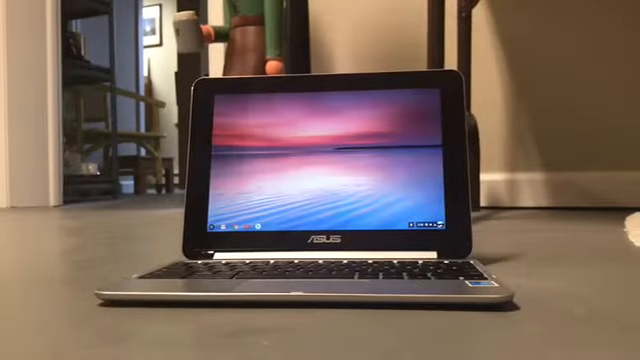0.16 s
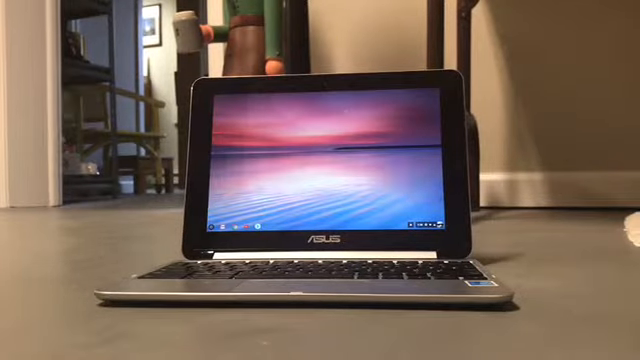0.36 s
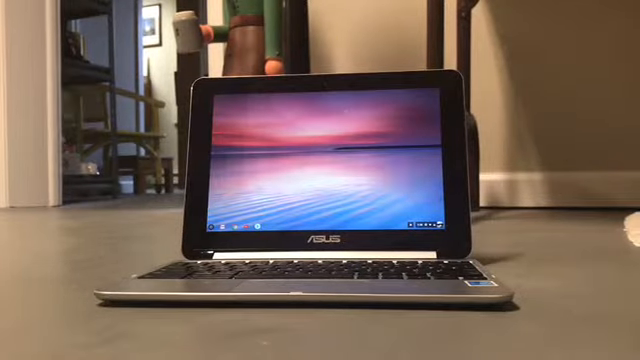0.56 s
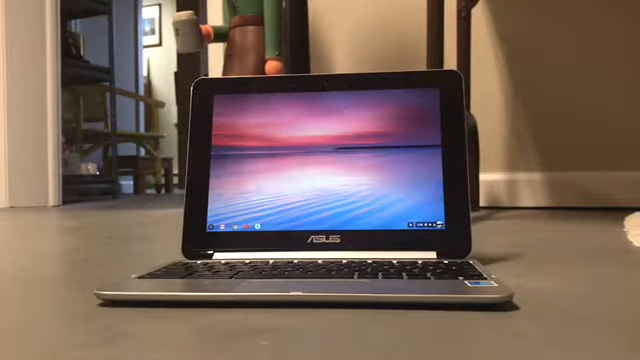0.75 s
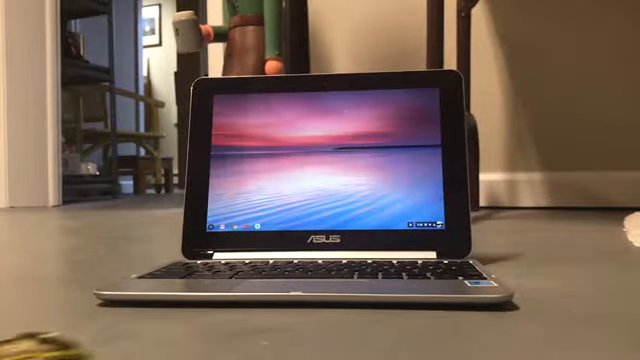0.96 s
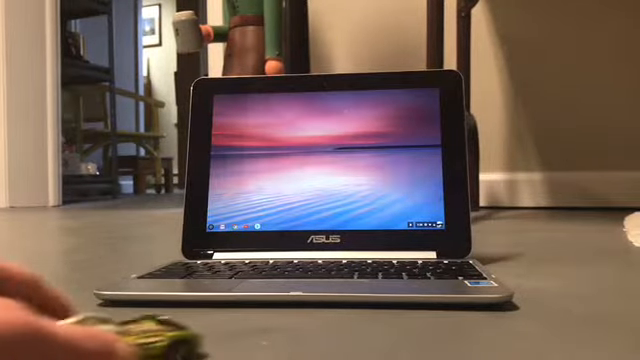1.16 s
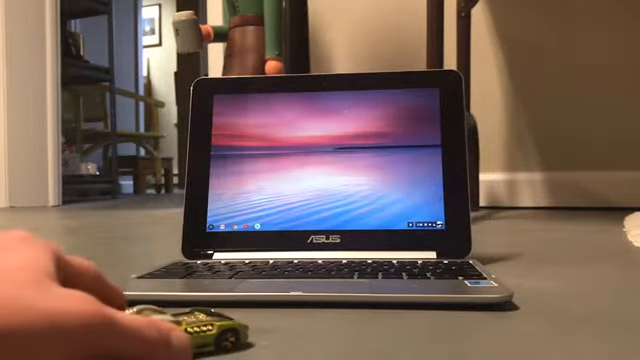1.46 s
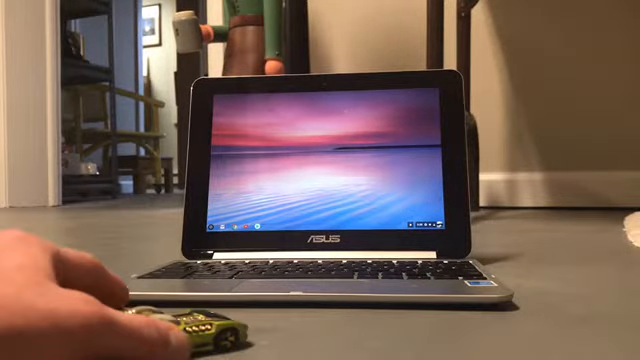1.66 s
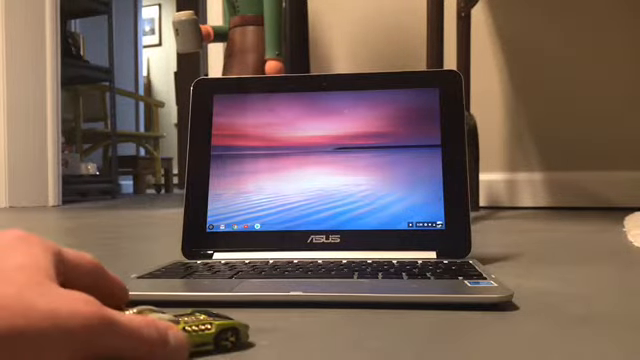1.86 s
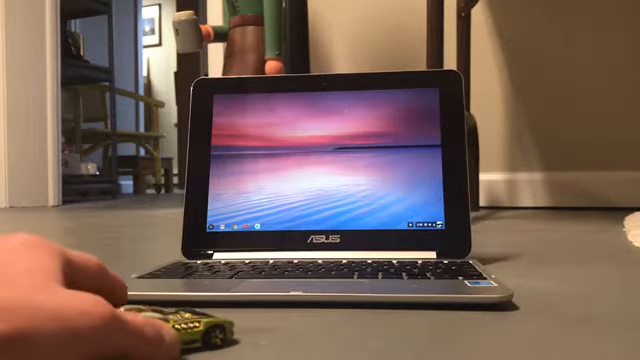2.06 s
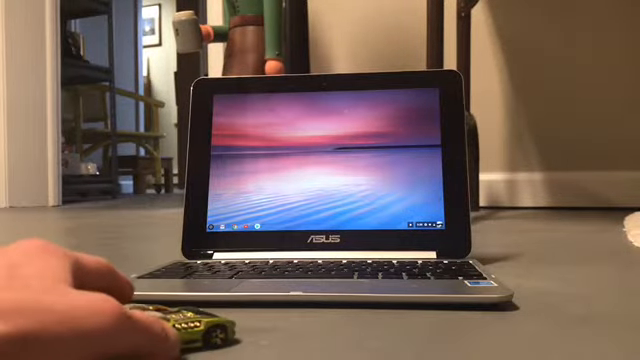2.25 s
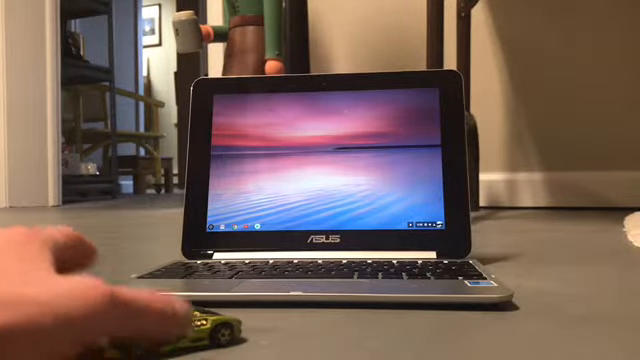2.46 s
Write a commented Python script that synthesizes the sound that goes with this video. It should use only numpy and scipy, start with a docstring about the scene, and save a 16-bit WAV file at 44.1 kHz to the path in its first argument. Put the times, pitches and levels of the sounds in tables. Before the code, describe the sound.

A die-cast toy car is pushed toward the microphone over a hard indoor floor, its wheels rattling and ticking. After it stops come a few small clicks and a faint hiss of skin, over a steady ventilation rumble.

```python
"""A die-cast toy car clicks down on a hard floor and is pushed towards the listener. Grit under its
bumpy wheels makes the metal body ring. It stops, clicks and crackles under the fingers and is nudged
once, then the hand slides away with a hiss of skin on the floor. The car echoes briefly in the room,
and a ventilation rumble runs underneath."""
import sys
import numpy as np
from scipy import signal
from scipy.fft import rfft, irfft
from scipy.io import wavfile
from scipy.ndimage import map_coordinates

SR = 44100
rng = np.random.default_rng(int(sys.argv[2]) if len(sys.argv) > 2 else 0)


def wrap_up_sound(samples):
    """Save the sound to the file named by the first command line argument, as 16-bit audio."""
    columns = np.atleast_2d(samples).T
    # keep every value between -1 and 1, then stretch to whole-number steps
    tamed = np.clip(columns, -1, 1)
    steps = np.round(tamed * 32767).astype(np.int16)
    wavfile.write(sys.argv[1], SR, steps)


N = 114660
TIME = np.arange(N) / SR

# the low, middle and high bands of the car's sound: (lower edge [Hz], upper edge [Hz])
BANDS = [(1300, 4500), (4500, 7500), (7500, 15900)]
BAND_FILTERS = [signal.butter(3, band, "band", fs=SR, output="sos") for band in BANDS]
HIT_S = .005   # a click or knock has the energy of a steady sound this long at its level


def rolling():
    """The long push: the wheels ring the body, the floor murmurs, the tyres hiss as the car slows."""
    # loudness of the wheels in each band: (time [s], low [dB], middle [dB], high [dB])
    wheel_levels = [(0.199,-66,-85.5,-77),(0.31,-58.5,-60,-63),(0.35,-52.5,-48,-57.5),(0.412,-60,-49,-57),(0.43,-48.5,-40.5,-46.5),(0.47,-49.5,-43.5,-48),(0.55,-43,-40.5,-44),(0.62,-47.5,-37.5,-39),(0.69,-43.5,-39.5,-46),(0.77,-42.5,-41.5,-47),(0.805,-39,-43.5,-49),(0.835,-41,-43,-47),(0.87,-44.5,-37,-45),(0.97,-45.5,-43.5,-51.5),(1.04,-44.5,-39,-46),(1.09,-42.5,-37,-44.5),(1.16,-45,-39,-43),(1.224,-45.5,-40,-44),(1.24,-52,-59,-65),(1.34,-70.5,-77,-82)]
    # the upper two bands creep up in pitch as the car rolls on: (time [s], pitch [ratio])
    ring_pitch = [(.35, 0.93), (.6, 0.96), (.85, 1.025), (1.2, 1.065)]
    # dull noise from the floor itself: (time [s], level [dB])
    floor_levels = [(.25, -66), (.44, -51.5), (.75, -57), (1.2, -57), (1.25, -74)]
    # hiss of the tyres: (time [s], level [dB])
    tyre_levels = [(1.02, -70), (1.12, -42), (1.22, -45), (1.245, -66)]
    low, *upper = wheel_noise()
    position = np.cumsum(np.interp(TIME, *np.transpose(ring_pitch)))   # reading faster raises the pitch
    upper = [map_coordinates(band, [position], order=5, mode="mirror") for band in upper]
    wheels = sum(gain * band for gain, band in zip(gain_curves(wheel_levels), [low, *upper]))
    floor = gain_curves(floor_levels)[0] * hiss(hz=1250, width_hz=1300)
    tyres = gain_curves(tyre_levels)[0] * hiss(hz=7170, width_hz=1700)
    return wheels + floor + tyres


def wheel_noise(bump_hz=84, bump_db=3, flutter_db=1.05, grains_per_s=9000, spread_db=3.5):
    """Grit taps the uneven wheels, harder on each bump, and rings the body; one signal per band."""
    bumps = np.cumsum(bump_hz * (1 + .147 * drift(hz=7.4))) / SR
    pressure = from_db(bump_db * np.cos(2 * np.pi * bumps) + flutter_db * drift(hz=70))
    sizes = from_db(spread_db * np.minimum(rng.exponential(1, N), 4))
    signs = rng.choice([-1, 1], N)
    hits = rng.random(N) < grains_per_s / SR
    ring = car_body(pressure * sizes * signs * hits)
    return [rms_one(signal.sosfilt(band, ring)) for band in BAND_FILTERS]


def car_body(force, direct_db=-7):
    """Each tap is heard directly and through the ringing of the metal car."""
    # the tones at which body and chassis ring: (pitch [Hz], width [Hz], gain [dB])
    body_tones = [(1700, 220, -11), (2670, 140, 0.5), (2934, 280, -0.5), (3314, 270, 1), (4740, 700, -14.5),
                  (5494, 450, 2), (5796, 280, 5), (6800, 730, -14), (8350, 700, -5), (9245, 460, 1.5),
                  (10780, 500, -6), (12100, 700, -5), (13500, 950, -7)]
    force = signal.sosfilt(signal.butter(2, 14000, fs=SR, output="sos"), force)
    ring = sum(from_db(db) * resonance(force, hz, width) for hz, width, db in body_tones)
    return from_db(direct_db) * force + ring


def clicks(size=1500, gain_db=.5):
    """Wheels and axles hit floor and body: each click is a quickly dying burst of tiny taps."""
    # clicks, with band levels before gain_db: (time [s], low [dB], middle [dB], high [dB], decay [s])
    hits = [(0.076,-59,-59,-67.5,0.0018),(0.2426,-33,-25.5,-26.5,0.0028),(0.266,-43,-37,-46,0.0038),(0.357,-50,-47,-54,0.0022),(0.388,-49.5,-42.5,-56,0.002),(0.4257,-42.5,-39.5,-42,0.003),(0.4457,-48,-38.5,-37,0.0011),(0.623,-41,-31,-31,0.001),(0.6314,-41,-33.5,-39,0.0024),(0.6703,-56,-39,-37,0.0022),(0.6958,-39,-36,-37.5,0.0022),(0.7198,-38,-36,-27,0.00082),(0.7308,-22,-23.5,-24,0.0016),(0.8017,-36.5,-37,-50,0.0044),(0.8487,-53,-35,-40.5,0.002),(1.0023,-46,-36,-43.5,0.0018),(1.0738,-36.5,-33,-34,0.002),(1.1205,-51,-33,-47.5,0.0016),(1.509,-68,-71,-72.5,0.00083),(1.5252,-56,-53.5,-52,0.001),(1.7056,-52.5,-62,-55.5,0.00032),(1.8008,-55,-50,-65,0.0014),(1.8139,-46,-47,-58,0.0046),(1.83,-56,-54,-49,0.0012),(1.8385,-51,-40,-44,0.0017),(1.8488,-31.5,-32,-34,0.0014),(2.0213,-82,-78,-64,0.0003),(2.266,-57.5,-53,-81,0.0038),(2.2791,-49,-43,-48,0.003)]
    out = np.zeros(N + size)
    for start, *levels_db, decay_s in hits:
        taps = rng.choice([-1, 1], size) * np.exp(-TIME[:size] / decay_s)
        ring = car_body(taps)
        bands = [rms_one(signal.sosfilt(band, ring)) for band in BAND_FILTERS]
        i = int(start * SR)
        out[i:i + size] += sum(from_db(db) * band for db, band in zip(levels_db, bands))
    return from_db(gain_db) * np.sqrt(HIT_S * SR / size) * out[:N]


def rattles(swell_db=7.5, release_s=.0018, gain_db=2.5):
    """The wheels turn briefly, getting louder until they catch."""
    # short turns, with band levels before gain_db: (start [s], end [s], low [dB], middle [dB], high [dB])
    turns = [(0.7254, 0.734, -44, -26, -31), (1.775, 1.787, -64, -63.5, -78),
             (1.825, 1.844, -46.5, -40.5, -55), (1.845, 1.864, -58, -52, -63)]
    bands, out = wheel_noise(), np.zeros(N)
    for start, end, *levels_db in turns:
        span = slice(int(start * SR), int((end + 2 * release_s) * SR))
        swell = from_db(np.interp(TIME[span], [start, end], [-swell_db, 0]))
        release = np.exp(-np.maximum(TIME[span] - end, 0) / release_s)
        for db, band in zip(levels_db, bands):
            out[span] += from_db(db) * rms_one(swell * release * band[span])
    return from_db(gain_db) * out


def knocks(size=1500):
    """The floor or a finger knocks the chassis; the grip shortens its ring and raises its pitch."""
    # blows: (time [s], level [dB], treble limit [Hz], damping [ratio], pitch [ratio])
    blows = [(0.0484,-60.5,3000,1,1.1),(.7313,-22.5,3700,2.4,1.15),(1.5255,-55,3700,1,1.2),(1.6766,-51.5,3500,1.4,1.15),(1.689,-58,3400,1.4,1.15),(1.7064,-61,3700,1,1.25),(1.8383,-41,3000,1.4,1),(1.8493,-25,4410,1.1,1),(2.0001,-59.5,3700,1,1.28),(2.072,-57.5,3800,1,1.33)]
    # low tones of the chassis, before the grip changes them: (pitch [Hz], width [Hz], gain [dB])
    chassis_tones = [(2535, 300, 2.5), (3250, 380, 1.5), (3950, 380, 0)]
    out = np.zeros(N + size)
    tap = signal.sosfilt(signal.butter(2, 1800, "high", fs=SR, output="sos"), signal.unit_impulse(size))
    for start, level_db, top_hz, damping, pitch in blows:
        force = signal.sosfilt(signal.butter(7, top_hz, fs=SR, output="sos"), tap)
        ring = sum(from_db(db) * resonance(force, hz * pitch, width * damping)
                   for hz, width, db in chassis_tones)
        i = int(start * SR)
        out[i:i + size] += from_db(level_db) * rms_one(ring)
    return np.sqrt(HIT_S * SR / size) * out[:N]


def finger_crackle(start_s=1.8, end_s=2.13, gap_s=.014, slip_db=-40.5, spread_db=6.5):
    """Skin slips on the car in tiny, uneven steps as the fingers shift their grip."""
    times = np.arange(start_s, end_s, gap_s)
    lateness, strength = rng.standard_normal((len(times), 2)).T
    times += .3 * gap_s * lateness
    slips = np.zeros(N)
    slips[(times * SR).astype(int)] = from_db(slip_db + spread_db * strength)
    return resonance(slips, hz=14000, width_hz=2700)


def hand_slide():
    """Skin sliding on the floor makes a smooth hiss."""
    # loudness of the rubbing: (time [s], level [dB])
    rub_levels = [(1.9, -90), (1.97, -71), (2.04, -70.5), (2.11, -62.5), (2.17, -85.5), (2.35, -83),
                  (2.41, -60), (2.48, -54.5), (2.55, -52), (2.6, -47)]
    # tone colour of the rubbing: (frequency [Hz], relative level [dB])
    rub_colour = [(1000, -5.5), (2500, -4.5), (4300, 0), (6000, 1), (7400, -4), (9000, 1.5), (11300, -5),
                  (14000, 1.5), (16000, -5)]
    return gain_curves(rub_levels)[0] * coloured_noise(rub_colour)


def room_echo(sound, near_db=-11.5, tail_db=-16.5):
    """Nearby things reflect the sound quickly; the room adds a tail whose treble dies sooner."""
    near_s, tail_s, treble_s = .059, .33, .28   # time each takes to fade by 60 dB
    t = TIME[:SR // 2]
    noise, near = rng.standard_normal((2, len(t))) * (t > .003)   # echoes begin after 3 ms
    dull = signal.sosfilt(signal.butter(1, 5000, fs=SR, output="sos"), noise)
    tail = dull * from_db(-60 * t / tail_s) + (noise - dull) * from_db(-60 * t / treble_s)
    near = near * from_db(-60 * t / near_s)
    echo = from_db(tail_db) * tail / np.linalg.norm(tail) + from_db(near_db) * near / np.linalg.norm(near)
    return signal.fftconvolve(sound, echo)[:N]


def ventilation(rumble_db=-47.5, hum_hz=58.8, hum_db=-62):
    """The ventilation gives a steady rumble and a low, slightly wavering hum."""
    # tone colour of the rumble: (frequency [Hz], relative level [dB])
    air_colour = [(20, -30), (40, -24.5), (58, -7.5), (75, -7.5), (98, -3.5), (140, -7), (195, 1),
                  (250, -4), (310, -13.5), (370, -12), (480, -19), (650, -15.5), (1000, -22.5),
                  (2000, -31.5), (4000, -38.5), (8000, -48.5), (16000, -51.5)]
    rumble = coloured_noise(air_colour)
    hum = np.sqrt(2) * np.sin(2 * np.pi * hum_hz * TIME + .5 * drift(hz=3.3))
    return from_db(rumble_db) * rumble + from_db(hum_db) * hum


def from_db(db):
    """Turn decibels into a gain to multiply by."""
    return 10 ** (np.asarray(db) / 20)


def rms_one(x):
    """Scale a signal so that its average strength (rms) is 1."""
    return x / np.sqrt(np.mean(x ** 2) + 1e-20)


def gain_curves(rows):
    """Turn each dB column of a table into a gain per sample, silent outside the table's times."""
    times, *columns = np.transpose(rows)
    return [from_db(np.interp(TIME, times, db, left=-120, right=-120)) for db in columns]


def drift(hz):
    """A random wobble of strength 1, mostly slower than the given rate."""
    r = np.exp(-2 * np.pi * hz / SR)
    return rms_one(signal.lfilter([1], [1, -2 * r, r * r], rng.standard_normal(N + SR))[SR:])


def coloured_noise(colour):
    """Steady noise of strength 1 with the given tone colour."""
    hz, db = np.transpose(colour)
    gain = from_db(np.interp(np.log(np.fft.rfftfreq(N, 1 / SR) + 1), np.log(hz), db))
    return rms_one(irfft(rfft(rng.standard_normal(N)) * gain, N))


def resonance(x, hz, width_hz):
    """Let a signal ring at one pitch; a smaller width rings longer."""
    r = np.exp(-np.pi * width_hz / SR)
    feedback = [1, -2 * r * np.cos(2 * np.pi * hz / SR), r * r]
    return signal.lfilter(np.array([1, 0, -1]) * (1 - r * r) / 2, feedback, x + 1e-18)


def hiss(hz, width_hz):
    """Noise of strength 1 around one pitch, filtered twice to keep it focused."""
    once = resonance(rng.standard_normal(N), hz, width_hz)
    return rms_one(resonance(once, hz, width_hz))


def scene():
    """The car, its echo, the hand and the ventilation in one channel."""
    car = rolling() + rattles() + clicks() + knocks() + finger_crackle()
    return (car + room_echo(car) + hand_slide() + ventilation())[None]


def record(dry):
    """Cut the highest treble steeply, above 15800 Hz."""
    return signal.sosfilt(signal.ellip(12, .2, 80, 15800, fs=SR, output="sos"), dry)


dry = scene()
out = record(dry)
wrap_up_sound(out)
```